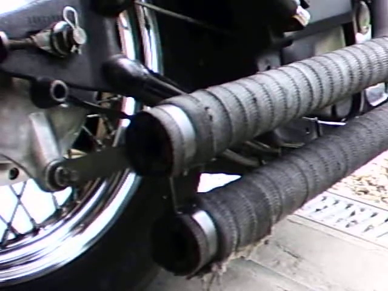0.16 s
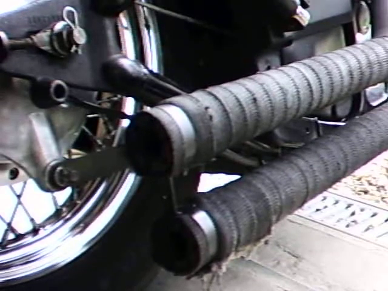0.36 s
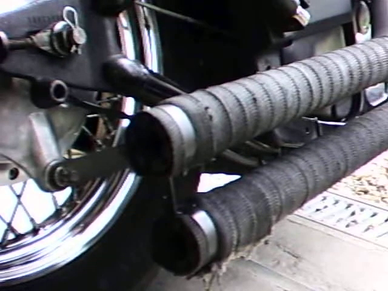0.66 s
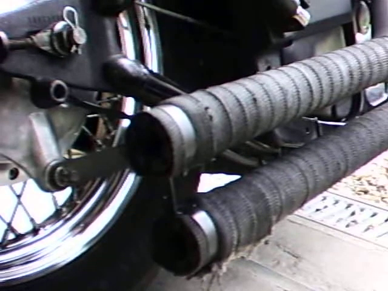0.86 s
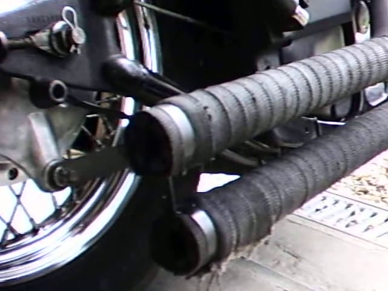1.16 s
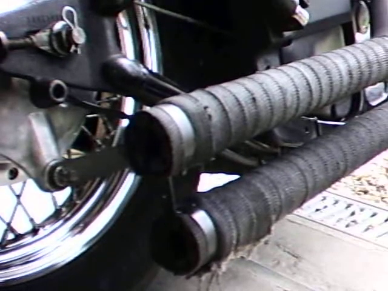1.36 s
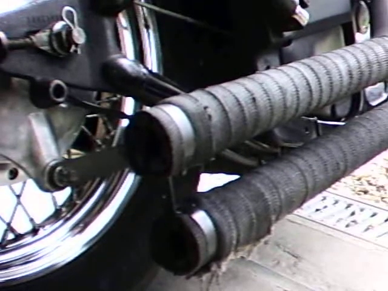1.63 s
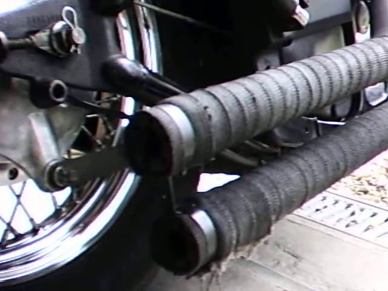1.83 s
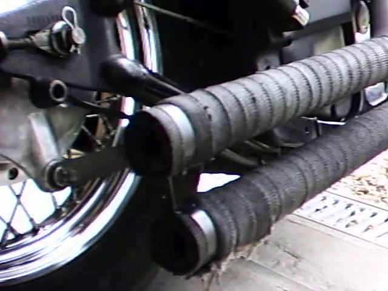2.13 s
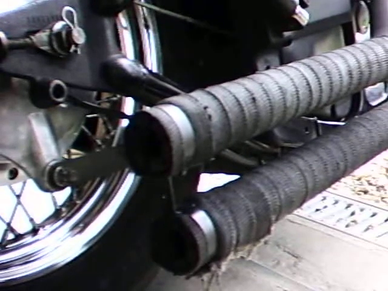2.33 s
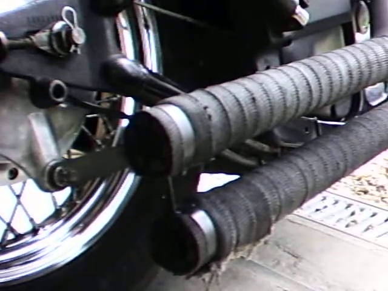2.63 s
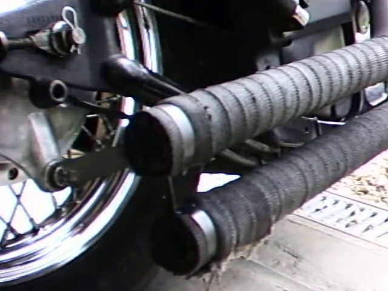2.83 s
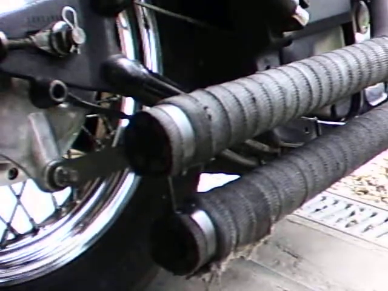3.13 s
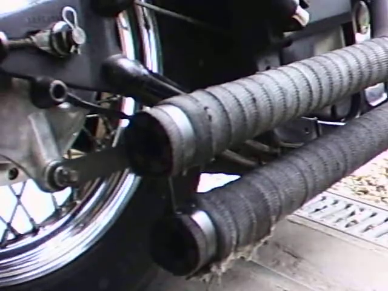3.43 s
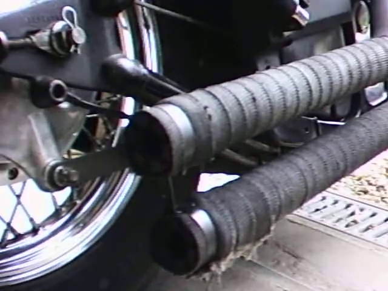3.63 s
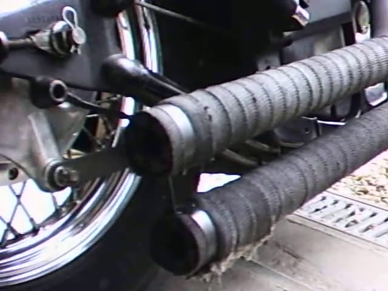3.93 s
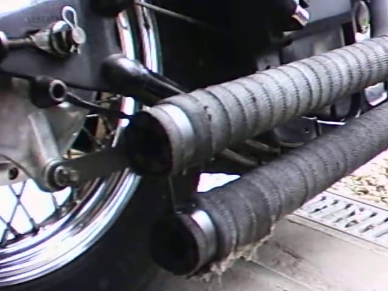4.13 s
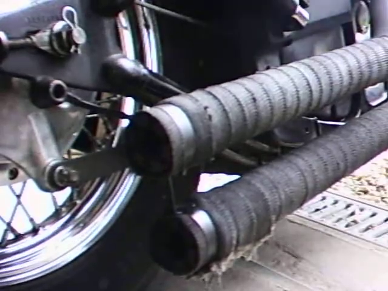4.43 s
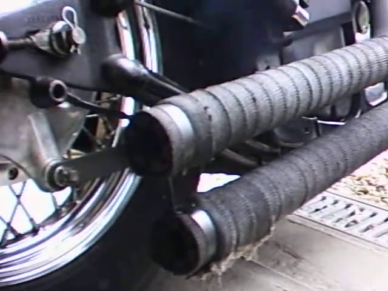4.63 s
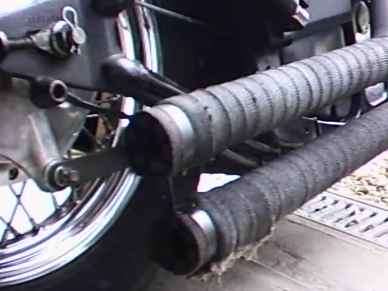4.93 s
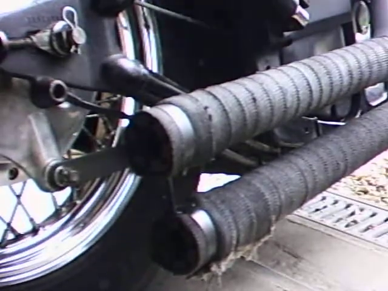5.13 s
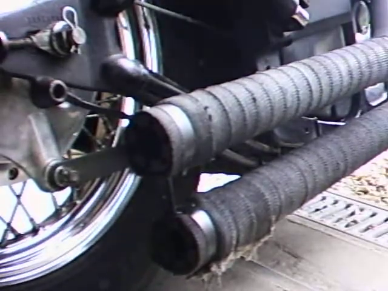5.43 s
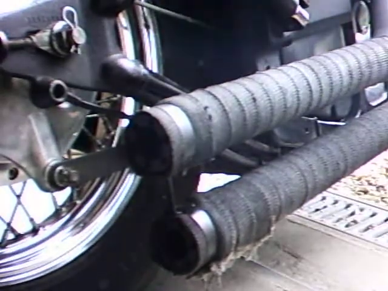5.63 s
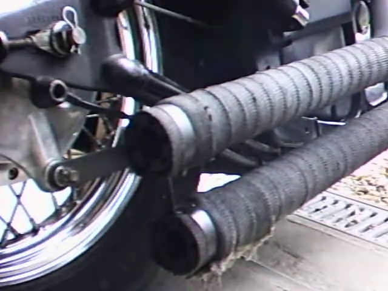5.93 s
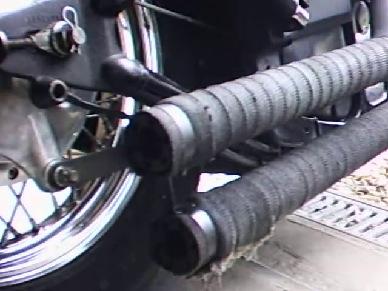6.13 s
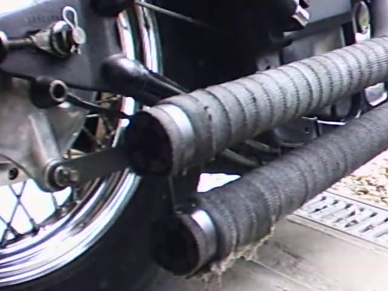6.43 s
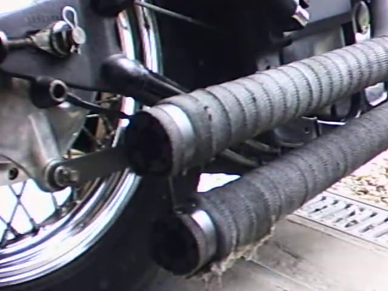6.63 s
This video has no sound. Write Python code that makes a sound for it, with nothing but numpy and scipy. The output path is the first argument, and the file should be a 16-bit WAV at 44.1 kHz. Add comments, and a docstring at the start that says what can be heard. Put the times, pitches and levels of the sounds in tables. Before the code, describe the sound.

A V-twin motorcycle revs through open exhaust pipes, dropping to a lumpy, chugging idle between sharp throttle blips.

```python
"""A V-twin motorcycle barks through two short open pipes, miked close behind it in a paved yard.
The throttle is blipped; between blips the engine sinks to a lumpy idle of paired, separate chugs.
Each firing is a gas blast with a shock front, a rasping ring of the pipes and a low thump that bends
upward. At speed the thumps fuse into a drone. The valve gear clatters underneath, the yard adds a
short, bright echo, and a narrow-band microphone rounds the peaks."""
import sys
import numpy as np
from scipy import signal
from scipy.fft import rfft, irfft, next_fast_len
from scipy.io import wavfile

SR = 44100
rng = np.random.default_rng(int(sys.argv[2]) if len(sys.argv) > 2 else 0)


def wrap_up_sound(samples):
    """Save the sound to the file named by the first command line argument, as 16-bit audio."""
    columns = np.atleast_2d(samples).T
    # keep every value between -1 and 1, then stretch to whole-number steps
    tamed = np.clip(columns, -1, 1)
    steps = np.round(tamed * 32767).astype(np.int16)
    wavfile.write(sys.argv[1], SR, steps)


N = 298998

# crank speed, which times every firing: (time [s], speed [rpm])
CRANK_SPEED = [(0.0, 2663.0), (0.19, 2793.0), (0.35, 2299.0), (0.62, 1678.0), (0.77, 2647.0),
               (0.95, 4903.0), (1.3, 3797.0), (1.69, 2548.0), (1.9, 1984.0), (2.32, 1302.0), (2.56, 1102.0),
               (3.12, 1106.0), (3.63, 988.0), (3.89, 1074.0), (4.15, 2102.0), (4.42, 2353.0),
               (4.61, 3731.0), (4.8, 3077.0), (4.98, 2668.0), (5.34, 2285.0), (5.39, 1972.0),
               (5.95, 1810.0), (5.98, 1851.0), (6.55, 1556.0), (6.8, 2767.0)]
# engine load, as the strength of a healthy firing: (time [s], level [dB])
ENGINE_LOAD = [(0, -18), (.13, -19.5), (.18, -27), (.32, -27), (.4, -34), (.62, -30.5), (.7, -19.5),
               (.9, -16), (1.1, -18.5), (1.39, -20), (1.44, -24), (2.1, -32), (2.9, -28), (3.85, -29),
               (3.98, -19.5), (4.44, -22), (4.59, -17), (4.92, -25), (5.2, -26.5), (5.44, -33.5),
               (5.55, -24.5), (6.3, -22), (6.43, -31), (6.58, -22.5), (6.78, -15.5)]
# steel walls and cross modes of the pipes: (frequency [Hz], width [Hz], boost [dB])
PIPE_RESONANCES = [(1234.5, 32, 6.5), (1331, 22, 3.5), (1640, 14, 2), (1748, 10, 7.5), (1998, 52, 5),
                   (2098, 20, 6), (2208, 54, 5.5), (2615, 79, 5.5), (2784, 42, 5.5), (2770, 33, 1.5),
                   (3056, 56, 4), (3213, 42, 3.5), (3825, 170, 12)]

REFERENCE_LOAD_DB, REFERENCE_RPM = -24, 2000
CHUG_S = .02  # a firing's level is its rms over this time


def exhaust():
    """Both open pipes from close behind: every firing sends out a bark, a rumble and a thump."""
    s, blast_db, rasp_db, thump_db, front = firings()
    gas = bark(s, blast_db, rasp_db) + crack(s[front]) + rumble(s, blast_db, thump_db)
    return gas + thumps(s, thump_db, front)


def firings():
    """Two unevenly spaced firings a cycle: time [s], blast, rasp, thump [dB], true for the front pipe."""
    # a cylinder only coughs: (time [s], drop below a healthy firing [dB])
    misfires = [(.59, 11.5), (1.73, 8), (1.83, 8.5), (2.09, 9), (2.19, 2), (2.28, 11), (2.42, 9.5),
                (2.63, 12), (2.79, 13), (3.01, 23.5), (3.18, 9.5), (3.34, 3), (3.4, 3), (3.76, 11),
                (5.28, 13.5), (5.76, 10.5), (5.89, 8), (6.13, 10), (6.16, 13), (6.2, 10.5), (6.37, 4.5),
                (6.52, 26)]
    # firings that go off harder and brighter: (time [s], extra rasp [dB])
    hard_firings = [(.47, 4.5), (2.16, 4), (2.37, 4), (2.47, 4.5), (2.53, 4), (2.68, 2.5), (2.74, 2),
                    (2.9, 2.5), (3.11, 3), (3.29, 2.5), (3.45, 2.5), (3.64, 2.5), (3.87, 2.5), (3.92, 2.5),
                    (5.49, 0), (5.55, 2), (5.67, 2), (5.93, 5), (6.09, 3.5), (6.23, 3.5), (6.49, 1.5),
                    (6.59, 3)]
    rear_lag_cycles, valve_lead_cycles, valve_lead_s = .405, .012, .002038
    rpm, cycles = crank()
    due = np.sort(np.r_[np.arange(0, cycles[-1]), np.arange(rear_lag_cycles - 1, cycles[-1])])
    at = np.searchsorted(cycles, due - valve_lead_cycles)  # the exhaust valves open ahead of the crank
    s, rear = at / SR - valve_lead_s, due % 1 > 0
    load_db = along(ENGINE_LOAD, s)[0] - on_nearest(misfires, s)
    hard_db = on_nearest(hard_firings, s)
    octaves = np.log2(rpm[at] / REFERENCE_RPM)
    blast_db = load_db - 1.53 * rear + .31 * hard_db
    rasp_db = -17.5 + .65 * (load_db - REFERENCE_LOAD_DB) - 1.38 * octaves + .42 * rear + hard_db
    thump_db = thump_level(load_db) + .35 * octaves - .27 * rear
    # once the firings overlap, each needs less energy for the same loudness
    overlap_db = 10 * np.log10(np.minimum(60 / rpm[at] / CHUG_S, 1))
    spread_db = rng.standard_normal((len(s), 3)).T  # no two firings burn alike
    levels = np.array([blast_db, rasp_db, thump_db]) + overlap_db + spread_db
    return s, *levels, ~rear


def crank():
    """Speed in rpm and the count of four-stroke cycles (two turns each), at every sample."""
    first_cycle_s = .018
    rpm, = along(CRANK_SPEED, np.arange(N) / SR)
    cycles = np.cumsum(rpm) / (120 * SR)
    return rpm, cycles - cycles[int(first_cycle_s * SR)]


def bark(s, blast_db, rasp_db):
    """Gas blasts out behind a steep pressure front and sets the steel pipes rasping."""
    # colour of the gas blast: (frequency [Hz], level [dB])
    blast_colour = [(150, -7.5), (330, 1), (500, 1.5), (750, 1.5), (1000, 1.5), (1220, 4), (1450, 0),
                    (1800, 2.5), (2400, -8), (4200, -20)]
    # colour of the pipes' rasp: (frequency [Hz], level [dB])
    rasp_colour = [(900, -34), (1500, -13.5), (1800, -3.5), (2200, -2.5), (2420, -6), (2650, 1),
                   (3200, -0.5), (3500, -2), (3850, -13.5), (4300, -3.5)]
    charge = from_db(blast_db + 24.5)  # a bigger charge takes longer to blow out
    blast = puff(s, blast_db - 2.5, open_s=.0067 * charge, tail_db=-.5, tail_s=.0049)
    shock = clicks(s + .002005, from_db(blast_db - 7.5) * np.sqrt(CHUG_S * SR))
    rasp = puff(s, rasp_db - 3.5, open_s=.0061 * charge, tail_db=4, tail_s=.013)
    # the jet keeps roaring between firings, and falls away as the throttle closes
    roar_db = blast_db - 5.5 + .85 * np.minimum(blast_db + 21, 0)
    roar = puff(s, roar_db, open_s=.029, tail_db=-4, tail_s=.0059)
    mids = body(blast + shock + roar, blast_colour, PIPE_RESONANCES)
    return mids + body(rasp + from_db(1) * roar, rasp_colour, PIPE_RESONANCES)


def crack(front_s):
    """With the throttle wide open the front pipe cracks once a cycle."""
    # spells of wide-open throttle: (start [s], end [s], level [dB])
    wide_open = [(0, .12, -16.5), (.8, .9, -17), (.98, 1.1, -14.5), (1.122, 1.41, -15), (4.54, 4.72, -19.5)]
    # colour of the crack: (frequency [Hz], level [dB])
    crack_colour = [(600, -12.5), (1200, 2.5), (1900, 15.5), (2400, 10.5), (2800, 12), (3400, -10.5),
                    (4200, -11)]
    s, db = np.transpose([(at, level) for start, end, level in wide_open
                          for at in front_s if start <= at < end])
    return body(puff(s, db - 1, open_s=.0026, tail_db=-2.5, tail_s=.019), crack_colour, [])


def rumble(s, blast_db, thump_db):
    """Turbulent gas rumbles in the pipes, growing faster with the blast than the thump does."""
    # colour of the turbulence: (frequency [Hz], level [dB])
    rumble_colour = [(15, -29), (30, -8.5), (50, -11), (100, -5.5), (200, 2.5), (330, 5.5), (420, -4),
                     (700, -36)]
    # low resonances of the gas in the pipes: (frequency [Hz], width [Hz], boost [dB])
    gas_resonances = [(203, 28, 4), (235, 22, -0.5), (319.4, 40, 4.5)]
    db = thump_db - 1.5 + .19 * (blast_db - REFERENCE_LOAD_DB)
    return body(puff(s, db, open_s=.012, tail_db=-1, tail_s=.014), rumble_colour, gas_resonances)


def puff(s, db, open_s, tail_db, tail_s):
    """Turbulent gas rushes out while the exhaust valve opens, then dies away in the pipe."""
    height = from_db(2 * db) * CHUG_S / open_s
    rush = fade(np.cumsum(clicks(s, height) - clicks(s + open_s, height)), .0011)
    tail_power = from_db(2 * tail_db)
    power = (rush + tail_power * fade(rush, tail_s)) / (1 + tail_power)
    return np.sqrt(np.abs(power)) * rng.standard_normal(N)


def thumps(s, thump_db, front):
    """Each cylinder thumps its own pipe; at speed the thumps give up some level to the drone."""
    # air column of the front pipe: (frequency once the flow stops [Hz], level [dB], decay [s])
    front_pipe = [(76, -8.5, 0.026), (144, 2, 0.013), (218.3, -9.5, 0.052), (395.3, -1, 0.015)]
    # air column of the rear pipe: (frequency once the flow stops [Hz], level [dB], decay [s])
    rear_pipe = [(67, -21, .035), (119.5, -1.5, 0.037), (183, 0.5, 0.019), (334.8, 1, 0.021)]
    db = thump_db - .5 - 3.5 * fusion(along(CRANK_SPEED, s)[0])
    front_thump = air_column(s[front] + .0024, db[front], front_pipe, sag=.23, flow_s=.017)
    rear_thump = air_column(s[~front] + .0018, db[~front], rear_pipe, sag=.26, flow_s=.022)
    return front_thump + rear_thump


def air_column(s, db, modes, sag, flow_s):
    """Each firing sets a pipe ringing; the outflow holds its notes flat, and they bend up as it dies."""
    t = np.arange(SR // 5) / SR
    travel = t - sag * flow_s * (1 - np.exp(-t / flow_s))
    ring = sum(from_db(level_db) * np.exp(-t / decay_s) * np.sin(2 * np.pi * hz * travel)
               for hz, level_db, decay_s in modes)
    # the small pipe mouth radiates the deepest bass poorly
    ring = signal.sosfilt(signal.butter(2, 65, "high", fs=SR, output="sos"), ring)
    kicks = clicks(s, from_db(db) * np.sqrt(CHUG_S * SR))
    return signal.fftconvolve(kicks, ring / np.linalg.norm(ring))[:N]


def thump_level(load_db):
    """The thump, in dB, grows with the load until the pipes are full."""
    return -29 + .4 * np.minimum(load_db - REFERENCE_LOAD_DB, 0)


def drone(db, centre_hz, width_octaves):
    """At speed the pressure swings fuse into gliding tones, loudest near the pipes' quarter wave."""
    # clean low harmonics of the engine cycle: (multiple, level [dB])
    harmonics = [(3, -1), (4, -6.5), (5, 1)]
    pipe_delay_s = .0029  # from the valves to the pipe mouths
    rpm, cycles = crank()
    cycle_hz = rpm / 120
    phase = 2 * np.pi * (cycles - pipe_delay_s * cycle_hz)
    tones = np.zeros(N)
    for multiple, level_db in harmonics:
        off_centre = np.log2(multiple * cycle_hz / centre_hz) / width_octaves
        tones += from_db(level_db) * np.cos(multiple * phase) / (1 + off_centre ** 4)
    load_db, = along(ENGINE_LOAD, np.arange(N) / SR)
    drone_db = thump_level(load_db) + db + 1.5 * np.log2(rpm / REFERENCE_RPM)
    return fusion(rpm) * from_db(drone_db) * tones


def fusion(rpm, start_rpm=2200, span_rpm=600):
    """How far the firings have run together into a drone, 0 to 1."""
    return np.clip((rpm - start_rpm) / span_rpm, 0, 1)


def valve_gear(ticks_per_s, tick_s, whirr):
    """Uneven metal ticks over a steady whirr of chain and gears, louder with speed and load."""
    # colour of the valve gear and primary drive: (frequency [Hz], level [dB])
    clatter_colour = [(40, -2.5), (110, 8), (330, 2), (500, -12), (1000, 5), (1500, -2.5), (2100, 6.5),
                      (2420, 6), (2750, 4), (3300, 4), (4200, -5)]
    t = np.arange(N) / SR
    octaves = np.log2(along(CRANK_SPEED, t)[0] / REFERENCE_RPM)
    level_db = -31 + 5 * octaves + .68 * (along(ENGINE_LOAD, t)[0] - REFERENCE_LOAD_DB)
    ticks = (rng.random(N) < ticks_per_s / SR) * rng.exponential(1, N) * SR / ticks_per_s
    texture = np.sqrt((fade(ticks, tick_s) + whirr) / (1 + whirr)) * rng.standard_normal(N)
    return body(texture * from_db(level_db), clatter_colour, PIPE_RESONANCES)


def yard(x, t60_s, wet_db, low_cut_hz):
    """Short, bright scatter reaches the microphone from the bike's metalwork, paving and nearby walls."""
    t = np.arange(SR // 2) / SR
    echoes = rng.standard_normal(len(t)) * from_db(-60 * t / t60_s) * (t > .008)
    echoes = signal.sosfilt(signal.butter(2, low_cut_hz, "high", fs=SR, output="sos"), echoes)
    return x + from_db(wet_db) * signal.fftconvolve(x, echoes / np.linalg.norm(echoes))[:N]


def body(x, colour, modes):
    """Causal filter of unit power gain: a broad colour with resonances standing out of it."""
    size = next_fast_len(N + SR // 2, real=True)
    size += size % 2
    hz = np.maximum(np.arange(size // 2 + 1) * SR / size, 1)
    colour_hz, colour_db = np.transpose(colour)
    gain = from_db(np.interp(np.log(hz), np.log(colour_hz), colour_db))
    gain *= 1 + sum((from_db(db) - 1) / (1 + (2 * (hz - centre) / width) ** 2)
                    for centre, width, db in modes)
    gain = np.abs(gain) / (1 + (hz / colour_hz[-1]) ** 8) + 1e-6
    # minimum phase, so nothing rings before it is struck
    cepstrum = irfft(np.log(gain / np.sqrt(np.mean(gain ** 2))))
    cepstrum[1:size // 2] *= 2
    cepstrum[size // 2 + 1:] = 0
    return irfft(rfft(x, size) * np.exp(rfft(cepstrum)))[:N]


def clicks(s, heights):
    """One sample of the given height at each time."""
    return np.bincount(np.clip(np.round(s * SR).astype(int), 0, N), heights, N + 1)[:N]


def fade(x, seconds):
    """Spreads each click into an exponential decay of the same area."""
    r = np.exp(-1 / (seconds * SR))
    return signal.lfilter([1 - r], [1, -r], x + 1e-18)


def on_nearest(rows, s):
    """Hands each row (time [s], level [dB]) to the nearest of the times s; the others get 0 dB."""
    times, db = np.transpose(rows)
    return np.bincount(np.abs(s - times[:, None]).argmin(axis=1), db, len(s))


def along(rows, s):
    """The columns of a curve at times s."""
    knots, *columns = np.transpose(rows)
    return [np.interp(s, knots, c) for c in columns]


def from_db(db):
    """Decibels to gain."""
    return 10 ** (np.asarray(db) / 20)


def scene():
    """The motorcycle in the paved yard, in mono from close behind the pipes."""
    engine = exhaust() + drone(db=-6.5, centre_hz=126, width_octaves=.41)
    engine += valve_gear(ticks_per_s=200, tick_s=.0045, whirr=.98)
    return yard(engine, t60_s=.28, wet_db=-16.5, low_cut_hz=1210)[None]


def record(dry):
    """A narrow-band camera microphone rounds the peaks; the strongest clip and spit a little treble."""
    band_top_hz, cutoff_hz = 4140, 15800
    rounded = 1.1 * np.tanh(dry / 1.1)
    narrow = signal.sosfilt(signal.cheby1(12, .5, band_top_hz, fs=SR, output="sos"), rounded)
    clipped = np.clip(narrow, -.71, .71)
    return signal.sosfilt(signal.cheby2(12, 70, cutoff_hz, fs=SR, output="sos"), clipped)


dry = scene()
out = record(dry)
wrap_up_sound(out)
```